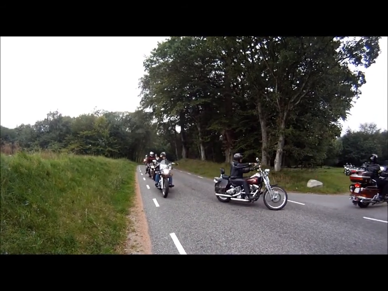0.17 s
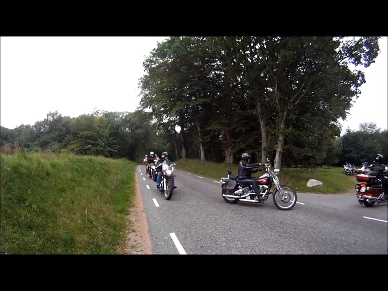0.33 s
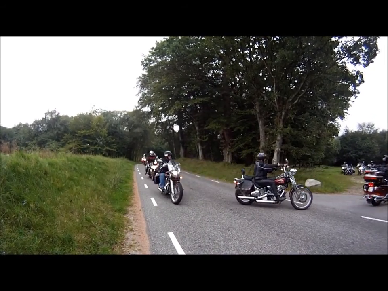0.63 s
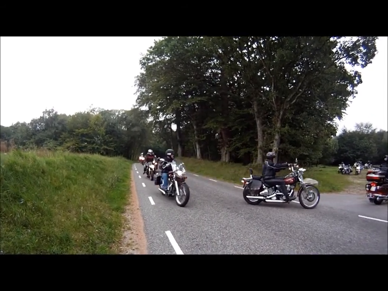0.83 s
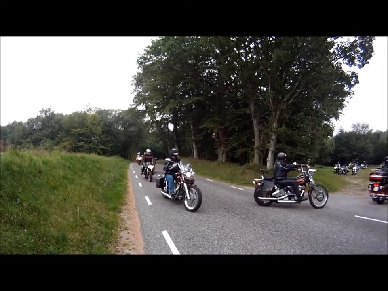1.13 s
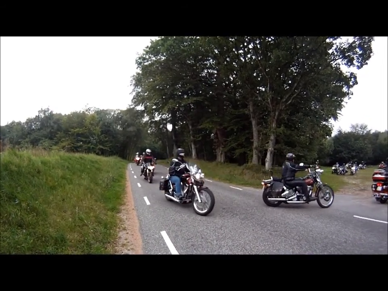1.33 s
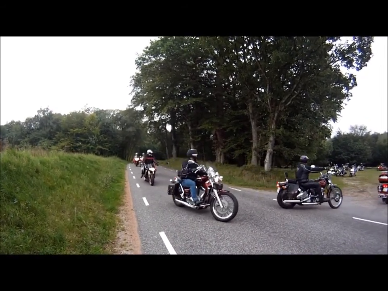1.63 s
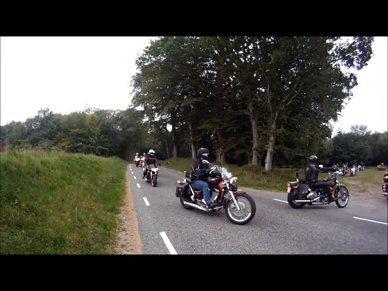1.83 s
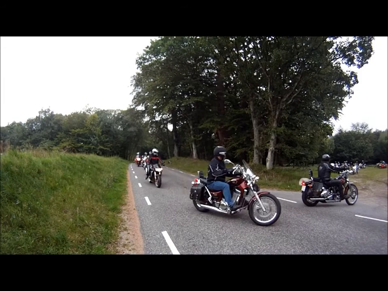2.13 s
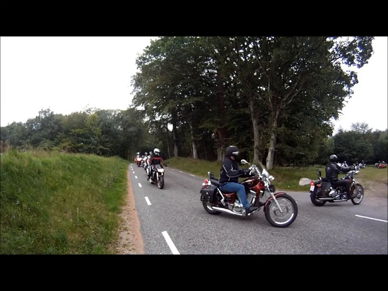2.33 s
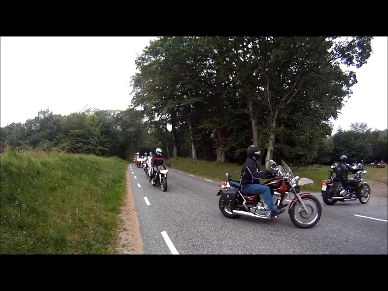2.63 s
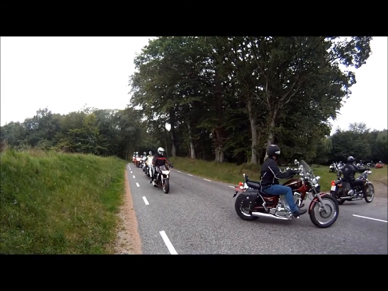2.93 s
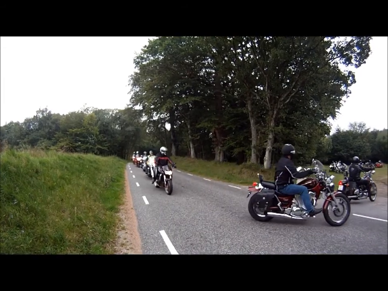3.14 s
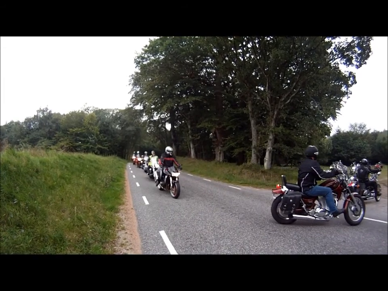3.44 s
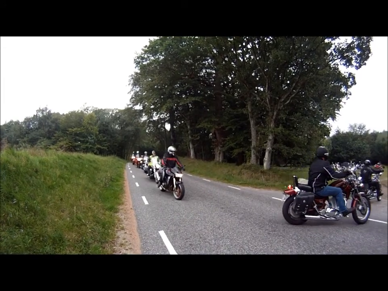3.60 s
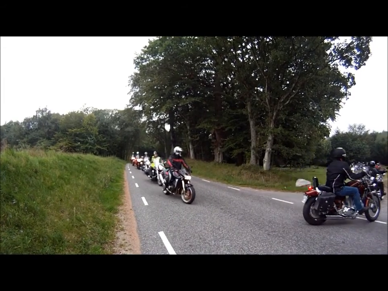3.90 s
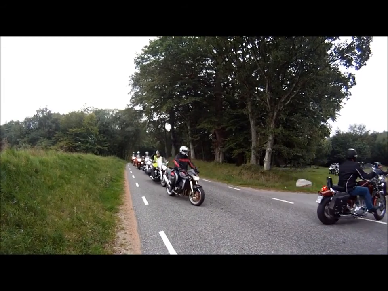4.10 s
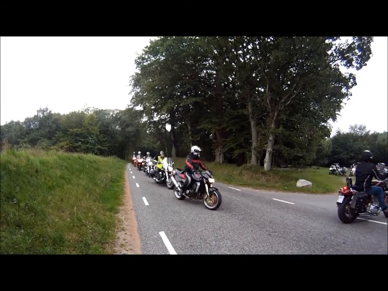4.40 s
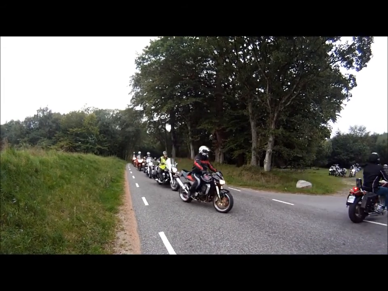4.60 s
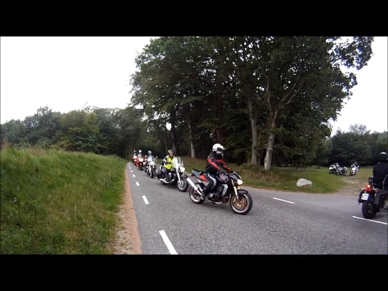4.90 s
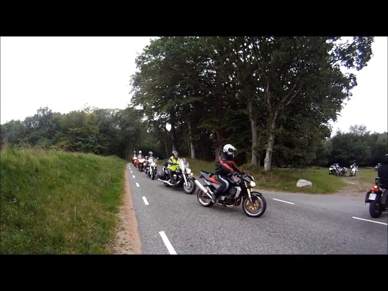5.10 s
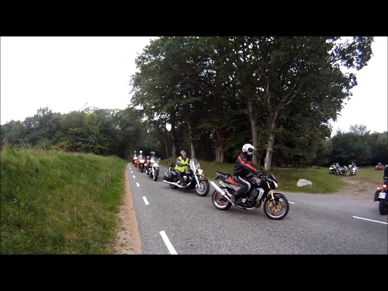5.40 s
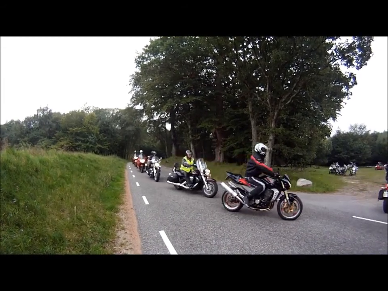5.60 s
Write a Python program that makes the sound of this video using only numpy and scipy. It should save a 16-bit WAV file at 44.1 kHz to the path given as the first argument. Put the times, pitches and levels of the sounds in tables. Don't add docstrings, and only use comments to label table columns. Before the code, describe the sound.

A column of motorcycles passes slowly on an open country road. A near twin pops in uneven pairs about seven times a second for three seconds, over a steady engine hum and heavy low rumble. Then the barks become weaker and more irregular, with thin brake squeals, a low gear whine and metal ticks. A small camera close by overloads softly, ducks after loud blows and sounds gritty.

```python
import sys
import numpy as np
from scipy import signal
from scipy.fft import rfft, irfft, next_fast_len
from scipy.io import wavfile
from scipy.ndimage import uniform_filter1d, map_coordinates

SR = 44100
rng = np.random.default_rng(int(sys.argv[2]) if len(sys.argv) > 2 else 0)


def linear_from_db(decibels):
    return 10 ** (np.asarray(decibels, float) / 20)


def waveform_to_disk(signal):
    frames = np.transpose(np.atleast_2d(signal))
    scaled = np.clip(frames, -1, 1) * 32767
    samples = np.round(scaled).astype(np.int16)
    wavfile.write(sys.argv[1], SR, samples)


N = 253575
T = np.arange(N) / SR

# time in seconds, rumble level in dB, roar level in dB as the bikes draw near.
COLUMN_LEVELS = [(0, -9, -34), (.11, -11, -36.5), (.49, -9, -36), (.88, -12, -37), (1.3, -10.5, -38),
                 (1.7, -11.5, -38.5), (1.98, -13.5, -38), (2.66, -9.5, -38), (3.08, -11.5, -37),
                 (3.3, -9.5, -38), (3.59, -12, -39), (3.84, -9.5, -35.5), (4.23, -16.5, -41),
                 (4.68, -11.5, -37), (5.17, -12.5, -37.5), (5.43, -12.5, -35), (5.61, -11.5, -39.5),
                 (5.75, -17, -38)]
COLUMN_FIRING_HZ = [14.9, 19, 23.5, 31]
# frequency in Hz, density in dB per Hz.
RUMBLE_COLOUR = [(12, -52), (20, -22), (65, 2), (113, -4), (206, -7.5), (241, -9.5), (304, -34),
                 (390, -24.5), (450, -36), (580, -68), (990, -120)]
# frequency in Hz, density in dB per Hz.
ROAR_COLOUR = [(160, -14), (280, 0), (477, -14.5), (653, -11.5), (992, -23.5), (1100, -26.5), (1430, -54),
               (2420, -120)]
# frequency in Hz, density in dB per Hz.
RATTLE_COLOUR = [(530, -2), (900, -7), (1190, -1.5), (1380, -2), (1850, -2), (2200, 0.5), (2490, -3.5),
                 (2850, 2), (3320, -7.5), (3820, -3.5), (4300, -10), (4770, -8.5), (5950, -22), (7740, -65),
                 (13100, -120)]
RATTLE_DB, RATTLE_PER_ROAR_DB, RATTLE_NEARS_DB_PER_S = -43, 0.94, 0.3647

# time in seconds, third order in Hz.
HUM_SPEED = [(0, 108.4), (.17, 117.64), (.46, 115.25), (.83, 122.52), (1.53, 112.56), (1.68, 117.66),
             (2, 116.22), (2.5, 118.19), (2.95, 114.12), (3.3, 117.6), (3.6, 118.58), (3.85, 119.03),
             (4.2, 112.13), (4.5, 115.55), (4.9, 116.34), (5.2, 116.63), (5.5, 115.86), (5.75, 118.73)]
# time in seconds, level in dB.
HUM_LEVEL = [(0, -21.5), (.17, -24.5), (.46, -24.5), (.83, -22), (1.53, -24.5), (1.68, -22), (2.0, -21.5),
             (2.6, -20.5), (3.06, -21.5), (3.49, -19.5), (3.75, -24), (3.92, -20.5), (4.22, -19),
             (4.5, -18.5), (4.9, -21), (5.3, -17), (5.75, -20.5)]
# order of the crank turn, level in dB.
HUM_HARMONICS = [(1, -3.5), (2, -1), (3, 0.5), (4, -16), (5, -18.5), (7, -14)]
SIXTH_DB, SIXTH_SWING_DB, SIXTH_GROWS_DB_PER_S = -13, 1, 0.96

# time in seconds, pitch in Hz, level in dB.
GEAR_WHINES = [
    [(0, 1180, -45), (.15, 1155, -50), (.25, 1170, -58), (.38, 1170, -46), (.5, 1150, -54)],
    [(.56, 1650, -58), (.66, 1663, -52), (.73, 1670, -64), (.8, 1650, -53), (.95, 1630, -66)],
]
# middle in seconds, length in seconds, pitch in Hz, level in dB.
BRAKE_SQUEALS = [(0.925, 0.08, 3775, -47), (1.122, 0.085, 3780, -40), (1.597, .06, 3680, -53),
                 (2.0, 0.045, 3800, -58), (2.148, 0.055, 3750, -46), (2.265, 0.063, 3730, -52),
                 (2.33, 0.041, 3690, -43), (2.402, 0.08, 3780, -44), (4.087, 0.056, 3755, -32.5),
                 (4.246, 0.023, 3530, -42), (5.04, 0.069, 3770, -43), (5.139, 0.077, 3730, -44),
                 (5.237, 0.044, 3780, -40.5), (5.312, 0.06, 3740, -45), (5.41, 0.066, 3790, -44),
                 (5.611, 0.081, 3730, -48), (5.69, 0.05, 3830, -47), (5.73, .04, 3870, -44)]
# middle in seconds, length in seconds, pitch in Hz, level in dB.
GEAR_CATCHES = [(3.31, 0.088, 790, -44), (3.418, 0.1, 790, -43), (3.492, 0.066, 790, -38),
                (3.62, 0.042, 790, -40), (3.72, 0.051, 780, -36), (3.869, 0.063, 770, -33),
                (3.997, 0.087, 760, -41), (4.122, 0.067, 745, -42), (4.204, 0.095, 690, -38.5),
                (3.787, 0.046, 395, -33), (4.065, 0.063, 400, -35), (4.242, 0.086, 402, -33.5),
                (3.85, .12, 255, -29)]
PHASE_UNREST, PHASE_UNREST_PER_KHZ = .1, .08

# start in seconds, peak in dB, pitch in Hz.
METAL_TICKS = [(0.588, -23, 3700), (0.607, -24, 4440), (3.357, -29, 3460), (3.472, -41, 3430),
               (3.649, -13.5, 4110), (3.701, -25, 3960), (3.738, -16, 3920), (3.8166, -19, 4800),
               (3.893, -19.5, 4530), (3.967, -22.5, 3840), (4.0656, -25, 3600), (4.1194, -29, 4000),
               (4.9263, -32, 3280), (5.0489, -31, 3660), (5.262, -31, 3730), (5.41, -22, 3870),
               (5.088, -21.5, 4480), (1.221, -26, 4230), (1.861, -37, 2930), (5.645, -30, 3400),
               (.788, -41, 3200), (1.392, -28, 3790), (2.467, -25, 3700), (3.63, -31, 3120),
               (3.995, -32, 3870), (4.541, -31, 3750), (4.937, -27, 4860), (5.202, -26, 4130),
               (5.31, -26, 4330), (5.369, -26.5, 4660), (5.51, -26, 4300)]
LINK_S, LINK_ROUND_S, LINK_DB, LINK_LOSS_DB, LINK_HZ, LINK_SAG_HZ = 4.4825, .0991, -19, 1.4, 4530, 60.4

# crest in seconds, peak in dB, pitch in Hz.
OTHER_BLOWS = [(.008, -3, 96), (.358, -4, 122), (.505, -8, 100), (0.612, -16, 100), (0.633, -7.5, 111),
               (0.874, -13, 105), (1.998, -12, 99), (2.038, -10.5, 103), (0.896, -5, 88), (.928, -3.5, 100),
               (1.191, -4, 102), (1.298, -4, 86), (1.707, -6.5, 92), (1.798, -5.5, 99), (2.51, -4.5, 120),
               (2.632, -5, 109), (3.23, -2.5, 103), (3.248, -1.5, 106), (3.37, -5, 92), (3.499, -4.5, 104),
               (3.527, -8.5, 97), (3.634, -4, 111), (3.759, -6, 139.6), (3.924, -8.5, 105),
               (4.067, -4.5, 108), (4.257, -3.5, 103), (4.353, -4, 122), (4.622, -4.5, 106),
               (4.767, -6, 105), (4.905, -5, 133), (5.095, -3.5, 105), (5.189, -10, 112),
               (5.314, -5.5, 119), (5.471, -4, 99), (5.703, -3, 108)]
# crest in seconds, peak in dB, pitch in Hz.
MORE_BLOWS = [(0.134, -5.5, 127), (0.158, -7.5, 116), (0.437, -6.5, 120), (0.824, -12, 80),
              (1.596, -8.5, 102), (1.753, -7, 91), (2.281, -6, 104), (2.656, -11, 86), (3.129, -4, 143),
              (3.203, -5, 123.4), (3.73, -8.5, 123), (3.747, -7, 148), (3.898, -5.5, 110),
              (4.024, -12, 101), (4.042, -9, 114), (4.174, -13, 99), (4.497, -6, 112), (4.571, -14.5, 114),
              (4.634, -4, 94), (4.708, -13, 80), (4.791, -11, 109), (4.825, -8.5, 110), (4.954, -5, 120),
              (5.059, -7, 127), (5.366, -5, 134), (5.42, -7.5, 151), (5.446, -14, 120), (5.499, -5, 98),
              (5.6, -5.5, 121), (5.627, -12, 123), (5.652, -11, 99)]
# crest in seconds, peak in dB, pitch in Hz.
STILL_MORE_BLOWS = [(0.059, -24, 82), (0.333, -13, 104), (0.408, -13, 110), (0.736, -24, 119),
                    (0.771, -13, 114), (0.913, -7.5, 128), (0.947, -4.5, 116), (1.474, -8.5, 76),
                    (1.731, -12, 114), (1.849, -31, 83), (2.072, -11, 127), (2.264, -10.5, 113),
                    (2.395, -9, 171), (2.59, -11, 101), (2.615, -16, 137), (2.94, -8, 132), (3.192, -11, 114),
                    (3.324, -12, 122), (3.346, -7, 130), (3.421, -9, 108), (3.447, -10, 170), (3.475, -8, 103),
                    (3.578, -9, 126), (3.6, -11, 102), (3.781, -6, 108), (3.822, -9, 173), (3.837, -9, 170),
                    (3.853, -11, 99), (3.871, -17, 168), (3.949, -14, 111), (3.963, -10, 109),
                    (3.999, -11, 139), (4.128, -7, 137), (4.147, -21, 164), (4.245, -6.5, 129),
                    (4.281, -9, 117), (4.385, -11, 105), (4.48, -9, 113), (4.551, -18, 97), (4.586, -11, 113),
                    (4.672, -14, 86), (4.748, -11, 168), (4.855, -16, 132), (4.878, -14, 116), (5.004, -8, 127),
                    (5.173, -14, 128), (5.213, -5.5, 170), (5.232, -12, 127), (5.265, -13.5, 131),
                    (5.289, -8, 168), (5.339, -10, 143), (5.403, -11, 121), (5.523, -12, 120), (5.573, -9, 170),
                    (5.677, -10.5, 129)]
# centre in Hz, width in Hz, level in dB.
LONG_PIPE_MODES = [(116, 12.4, -6.5)]
CREST_SHARE, CREST_WIDTH_S = 0.2, 0.0023

# rear firing in seconds, rear bark in dB, front bark in dB, rear blow in dB, front blow in dB.
TWIN_CYCLES = [(.105, -15.5, -18, -4.5, -1), (.254, -16, -22, -24, -5), (.394, -26, -16.5, -8, -1.5),
               (0.532, -16.5, -28, -2.5, -11.5), (.672, -17, -23.5, -5, -4.5),
               (.806, -20.5, -42, -5.5, -19), (.943, -27, -21, -22, -3.5), (1.081, -19, -35, -3, -26),
               (1.216, -26, -22, -1, -2), (1.352, -21.5, -42, -1.5, -30.5), (1.488, -27.5, -19.5, -3, -7.5),
               (1.621, -18.5, -30, -9, -23), (1.76, -29, -15.5, -6, -18), (1.889, -15.5, -41, -0.5, -27),
               (2.024, -27, -16.5, -4.5, -2.5), (2.156, -21.5, -41, -3, -15), (2.287, -30, -22.5, -2.5, -2),
               (2.422, -21.5, -33, -8, -27), (2.559, -18.5, -18, -3.5, -21), (2.689, -25, -46, -4.5, -16),
               (2.822, -17.5, -23, -5, -2.5), (2.951, -25, -44, -1, -3.5), (3.087, -20.5, -22.5, -4.5, -26),
               (3.215, -26, -42, -16, -11)]
# rear pipe in Hz, front pipe in Hz, rear crack ring in Hz, front crack ring in Hz.
TWIN_PITCHES = [(553, 615, 2570, 3100), (685, 530, 1900, 2200), (670, 530, 2840, 2900),
                (735, 570, 2230, 1660), (690, 720, 2000, 3000), (710, 580, 1670, 2000),
                (600, 610, 2900, 1500), (805, 590, 2860, 3740), (770, 730, 1300, 2890),
                (790, 590, 3100, 2730), (570, 660, 1900, 2100), (650, 640, 2840, 2010),
                (620, 633, 1900, 3000), (775, 600, 2700, 2700), (600, 600, 1900, 3100),
                (640, 780, 2700, 1590), (650, 614, 2200, 3100), (610, 630, 2960, 1100),
                (760, 586, 2360, 2860), (640, 610, 1700, 3200), (530, 654, 3770, 1900),
                (790, 580, 3100, 2820), (670, 476, 2950, 1800), (660, 730, 1500, 3100)]
# time in seconds, crack in dB over the bark,
# rear pipe note in Hz, ring in the crack in Hz.
PIPE_FACING = [(.1, -14, 565, 3000), (.27, -13, 636, 3010), (.45, -24, 600, 2600), (.54, -9, 734, 2220),
               (.72, -7.5, 670, 2250), (1.05, -9.5, 764, 2923), (1.35, -3, 766, 2880),
               (1.8, -8.5, 697, 2870), (2.4, -6, 687, 2940), (2.62, -7.5, 690, 3700),
               (2.84, -8.5, 610, 3840), (3.1, -13.5, 690, 2900)]
# start in seconds, peak in dB, crack in dB over the bark, pipe note in Hz.
OTHER_TWINS = [(.057, -24, -24, 600), (.498, -22, -28, 567), (.574, -27, -10.5, 571), (.607, -29.5, 2, 710),
               (1.181, -35, -27, 584), (1.86, -25, -10, 630), (1.986, -27, -20, 630),
               (3.355, -21.5, -14, 553), (3.452, -25.5, -10, 460), (3.774, -25.5, -6, 740),
               (4.055, -23.5, -12, 443), (4.115, -28, -25, 730), (4.199, -27.5, -11, 588),
               (4.463, -28, -10, 444), (4.534, -27, -18, 634), (4.823, -20, -17, 600),
               (4.896, -25, -21, 534), (5.045, -28, -4.5, 635), (5.088, -20, -18, 530),
               (5.296, -22.5, -18, 395), (5.302, -28.5, -14, 710), (5.392, -22, -34, 497),
               (5.578, -22.5, -14, 420), (5.601, -29, -42, 530), (3.628, -28, -8, 735),
               (3.701, -30.5, -2, 1110), (3.836, -25, -16, 560), (4.243, -29, -15, 440),
               (4.341, -34, -22, 640), (4.581, -28.5, -9, 650), (4.62, -29, -6, 600),
               (4.762, -33, -12, 696), (5.355, -28, -15.5, 477), (5.468, -38, -10, 620)]
# centre in Hz, width in Hz, level in dB.
BARK_MODES = [(350, 170, 1), (511, 226, 4), (614, 153, 6), (814, 280, -4)]
# centre in Hz, width in Hz, level in dB.
CRACK_MODES = [(1370, 180, 1), (2250, 270, 2), (2820, 164, 4.5), (3960, 790, -1.5)]
FRONT_AFTER = 315 / 720
BLOW_LAG_S, BLOW_HZ = 0.00613, 108
BARK_T60_S, REAR_KNOCK_DB = 0.024, -1.5
RING_DB, RING_T60_S, RING_LAG_S = 6, 0.027, 0.003013
SECOND_RING_DB = -4

# frequency in Hz, density in dB per Hz.
SIDE_COLOUR = [(12, -30), (25, 7), (60, -18), (120, -9.5), (250, -16), (600, -16.5), (1200, -14),
               (3050, -16.5), (5950, -33), (8500, -29), (12000, -39), (15300, -38)]
SIDE_DB, LEFT_WEAKER = -44, .007
HOLD_HZ, TOP_HZ = 12000, 15430
DUCK_FROM_DB, DUCK_SLOPE, DUCK_IN_S, DUCK_OUT_S = -6.5, 2.7, 0.0076, 0.045


def unit(x):
    return x / np.sqrt(np.mean(x ** 2) + 1e-20)


def along(points, hz):
    f, v = np.transpose(points)
    return np.interp(np.log(hz + 1), np.log(f + 1), v)


def curves(rows):
    s, *columns = np.transpose(rows)
    return [np.interp(T, s, values) for values in columns]


def wobble(rate):
    knots = rng.standard_normal(int(N * rate / SR) + 4)
    return map_coordinates(knots, [T * rate])


def filtered(x, response):
    size = next_fast_len(N + SR // 2)
    hz = np.fft.rfftfreq(size, 1 / SR)
    return irfft(rfft(x, size) * response(hz), size)[..., :N]


def coloured(x, spectrum):
    return unit(filtered(x, lambda hz: linear_from_db(along(spectrum, hz))))


def resonant(x, modes):
    def response(hz):
        total = 0
        for k, (centre, width, db) in enumerate(modes):
            band = 1j * hz * width
            total = total + (-1) ** k * linear_from_db(db) * band / (centre * centre - hz * hz + band)
        return total
    return filtered(x, response)


def patchy(x, depth_db):
    z = signal.stft(x, nperseg=256)[2]
    field = uniform_filter1d(rng.standard_normal(z.shape), size=2, axis=0)
    field = uniform_filter1d(field, size=8, axis=1)
    return signal.istft(z * linear_from_db(depth_db * unit(field)), nperseg=256)[1][:N]


def twin_firings():
    rear = np.transpose(TWIN_CYCLES)[0]
    cycle = np.diff(rear)
    cycle = np.append(cycle, cycle[-1])
    return np.concatenate([rear, rear + FRONT_AFTER * cycle])


def all_barks():
    when = twin_firings()
    s, crack_db, _, ring_hz = np.transpose(PIPE_FACING)
    bark_db = np.transpose(TWIN_CYCLES)[1:3].ravel()
    pitches = np.transpose(TWIN_PITCHES)
    knock_db = np.repeat([REAR_KNOCK_DB, 0], len(TWIN_CYCLES))
    near = [when, bark_db, np.interp(when, s, crack_db), pitches[:2].ravel(), pitches[2:].ravel(), knock_db]
    others = [(*row, np.interp(row[0], s, ring_hz), 0) for row in OTHER_TWINS]
    return np.vstack([np.transpose(near), others])


def all_blows():
    when = twin_firings() + BLOW_LAG_S
    near = [when, np.transpose(TWIN_CYCLES)[3:].ravel(), np.full(len(when), BLOW_HZ)]
    rows = np.vstack([np.transpose(near), OTHER_BLOWS, MORE_BLOWS, STILL_MORE_BLOWS])
    return sorted(map(tuple, rows))


def firings(rate_hz, scatter_db):
    turns = np.cumsum(rate_hz * (1 + .05 * wobble(2))) / SR
    return np.diff(np.floor(turns), prepend=0) * linear_from_db(scatter_db * rng.standard_normal(N))


def column():
    rumble_db, roar_db = curves(COLUMN_LEVELS)
    rattle_db = RATTLE_DB + RATTLE_PER_ROAR_DB * (roar_db - roar_db.mean()) + RATTLE_NEARS_DB_PER_S * T
    pulses = sum(firings(hz, scatter_db=2.0) for hz in COLUMN_FIRING_HZ)
    rumble = coloured(unit(pulses) + 0.7 * rng.standard_normal(N), RUMBLE_COLOUR)

    blow_rows = all_blows()
    places = [round((s - .004) * SR) for s, _, _ in blow_rows]
    sizes = linear_from_db([db + 6 for _, db, _ in blow_rows])
    pulses = pulses + 2.0 * np.bincount(places, sizes, N)
    beat = unit(signal.fftconvolve(pulses, np.exp(-T[:SR // 20] / 0.0023))[:N])
    roar = coloured((0.96 + 0.56 * beat) * rng.standard_normal(N), ROAR_COLOUR)

    struck = rng.random(N) < 450 / SR
    clicks = unit(struck * linear_from_db(3.0 * rng.standard_normal(N)) * rng.standard_normal(N))
    air = (1.43 + 0.27 * beat) * rng.standard_normal(N)
    rattle = coloured(patchy(air + 0.65 * clicks, depth_db=2.0), RATTLE_COLOUR)
    return linear_from_db(rumble_db - 8.5) * rumble + linear_from_db(roar_db + 5.0) * roar + linear_from_db(rattle_db + 1.5) * rattle


def trees(x):
    t = T[:SR // 4]
    tail = rng.standard_normal(len(t)) * linear_from_db(-60 * t / 0.077) * (t > .006)
    return signal.fftconvolve(x, tail / np.linalg.norm(tail))[:N]


def hum():
    (third_hz,), (db,) = curves(HUM_SPEED), curves(HUM_LEVEL)
    sixth_db = SIXTH_DB + SIXTH_SWING_DB * wobble(3.47) + SIXTH_GROWS_DB_PER_S * T
    turn = 2 * np.pi * np.cumsum(third_hz / 3) / SR

    def wavering(order):
        return linear_from_db(2.2 * wobble(12)) * np.cos(order * turn + .25 * wobble(8))

    steady = sum(linear_from_db(level) * wavering(order) for order, level in HUM_HARMONICS)
    return linear_from_db(db - 1.5) * (steady + linear_from_db(sixth_db) * wavering(6))


def whine(rows, rough_db):
    hz, db = curves(rows)
    fade = np.clip(np.minimum(T - rows[0][0], rows[-1][0] - T) / 0.005, 0, 1)
    level = np.sqrt(2) * fade * linear_from_db(db + rough_db * wobble(31))
    return level * np.sin(2 * np.pi * np.cumsum(hz) / SR + 0.74 * wobble(69.0))


def squeal():
    out, drift = np.zeros(N), wobble(120)
    for s, length, hz, db in BRAKE_SQUEALS + GEAR_CATCHES:
        late = T - s
        swell = np.exp(-(late / length * np.where(late < 0, 1.5, 2.1)) ** 2)
        unrest = (PHASE_UNREST + PHASE_UNREST_PER_KHZ * hz / 1000) * drift
        phase = 2 * np.pi * hz * late * (1 - 0.035 * late) + unrest
        out += linear_from_db(db - 1) * swell * np.sin(phase)
    return out * linear_from_db(1.8 * wobble(80))


def ticks():
    out, t = np.zeros(N + SR), np.arange(SR // 50) / SR
    link = []
    for k in range(6):
        link.append((LINK_S + k * LINK_ROUND_S, LINK_DB - k * LINK_LOSS_DB, LINK_HZ - k * LINK_SAG_HZ))
    for s, db, hz in METAL_TICKS + link:
        contact = .35 * np.sin(2 * np.pi * hz * t) + rng.standard_normal(len(t))
        envelope = linear_from_db(db + 8 - 60 * t / 0.02) * (1 - np.exp(-t / 0.0022))
        out[round(s * SR):][:len(t)] += envelope * contact

    def small_metal(hz):
        low_cut = (hz / 2800) ** 3 / (1 + (hz / 2800) ** 3)
        return low_cut / (1 + (hz / 5500) ** 8)

    return filtered(out[:N], small_metal)


def blows():
    out, lead = np.zeros(N + SR), SR // 20
    t = (np.arange(2 * lead) - lead) / SR
    for s, db, hz in all_blows():
        push = np.cos(2 * np.pi * hz * t) * np.exp(-(t * hz / np.where(t < 0, .56, .72)) ** 2)
        crest = np.cos(2 * np.pi * 2.24 * hz * t) * np.exp(-(t / CREST_WIDTH_S) ** 2)
        out[round(s * SR):][:len(t)] += linear_from_db(db - 2.0) * (push + CREST_SHARE * crest)
    air = out[lead:][:N]
    return air + resonant(air, LONG_PIPE_MODES)


def puffs(events, rise, fall):
    out, t = np.zeros(N + SR), np.arange(SR // 20) / SR
    shape = (1 - np.exp(-t / rise)) * np.exp(-(t / fall) ** 2)
    for s, db in events:
        out[round(s * SR):][:len(t)] += linear_from_db(db) * shape * unit(rng.standard_normal(len(t)))
    return out[:N]


def twin():
    knock, t = np.zeros(N + SR), T[:SR // 20]
    barks = all_barks()
    for s, db, crack_db, pipe_hz, ring_hz, knock_db in barks:
        second_hz = rng.uniform(1300, 4600)
        modes = np.sin(2 * np.pi * ring_hz * t) + linear_from_db(SECOND_RING_DB) * np.sin(2 * np.pi * second_hz * t)
        ring = linear_from_db(db + crack_db + RING_DB - 60 * t / RING_T60_S) * (1 - np.exp(-t / 0.0021)) * modes
        knock[round((s + RING_LAG_S) * SR):][:len(t)] += ring
        envelope = linear_from_db(db + knock_db + 8 - 60 * t / BARK_T60_S) * (1 - np.exp(-t / 0.0024))
        knock[round(s * SR):][:len(t)] += envelope * np.sin(2 * np.pi * pipe_hz * t)
    puff_rows = [(s, db + 8.0) for s, db, *_ in barks]
    crack_rows = [(s + 0.00104, db + crack_db + 14.5) for s, db, crack_db, *_ in barks]
    puff = resonant(puffs(puff_rows, rise=0.0013, fall=0.0087), BARK_MODES)
    crack = resonant(puffs(crack_rows, rise=0.0073, fall=0.0068), CRACK_MODES)
    return knock[:N] + puff + crack


def scene():
    near = twin() + ticks()
    lines = squeal() + sum(whine(rows, rough_db=2.6) for rows in GEAR_WHINES)
    mid = near + linear_from_db(-17.5) * trees(near) + blows() + hum() + column() + lines
    return np.array([mid, mid])


def gain_control():
    cut_db, late = np.zeros(N + SR), T[:SR // 2]
    shape = (1 - np.exp(-late / DUCK_IN_S)) * np.exp(-late / DUCK_OUT_S)
    for s, db, _ in all_blows():
        over_db = max(db - cut_db[round(s * SR)] - DUCK_FROM_DB, 0)
        cut_db[round((s + .003) * SR):][:len(late)] += DUCK_SLOPE * over_db * shape
    return cut_db[:N]


def held(x):
    edge = 735
    x = np.pad(x, ((0, 0), (edge, edge)), "reflect")
    size = x.shape[1]
    count = round(size * HOLD_HZ / SR)
    slow = np.fft.fft(signal.resample(x, count, axis=-1))
    bins = np.arange(size // 2 + 1)
    mirrored = slow[:, bins % count] * np.sinc(bins / count) * size / count
    return irfft(mirrored, size)[:, edge:-edge]


def roll_off(x):
    return signal.sosfilt(signal.butter(12, 16500, fs=SR, output="sos"), x)


def record(dry):
    cut_db = gain_control()
    x = dry * linear_from_db(-cut_db)
    x = held(x / (1 + np.abs(x / .9) ** 4) ** (1 / 4))
    x = filtered(x, lambda hz: hz ** 3 / (hz ** 3 + 34 ** 3))
    side = linear_from_db(SIDE_DB) * coloured(rng.standard_normal(N), SIDE_COLOUR)
    falling = uniform_filter1d(np.maximum(np.gradient(cut_db), 0), size=800) * 800
    bass = filtered(side, lambda hz: 1 / (1 + (hz / 300) ** 2)) * linear_from_db(7.0 + 5.5 * wobble(9))
    wide = patchy(side, depth_db=6) * 0.14 * np.clip(falling - .8, 0, 4)
    side = bass - LEFT_WEAKER * x[0] + wide
    mix = filtered(x + np.array([side, -side]), lambda hz: 1 / (1 + (hz / TOP_HZ) ** 200))
    return roll_off(mix)


dry = scene()
out = record(dry)
waveform_to_disk(out)
```